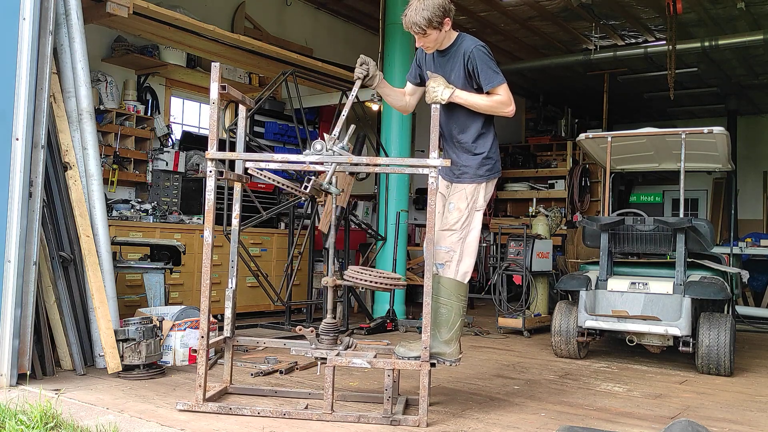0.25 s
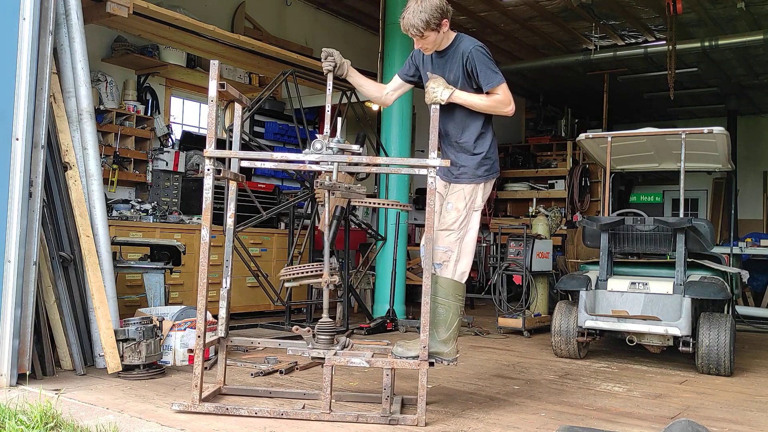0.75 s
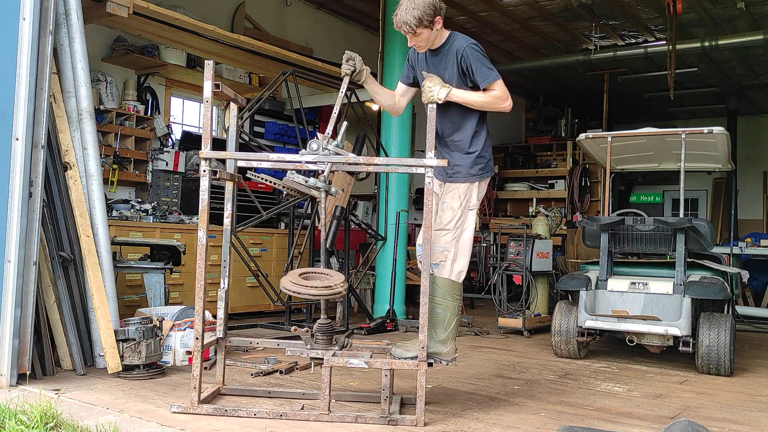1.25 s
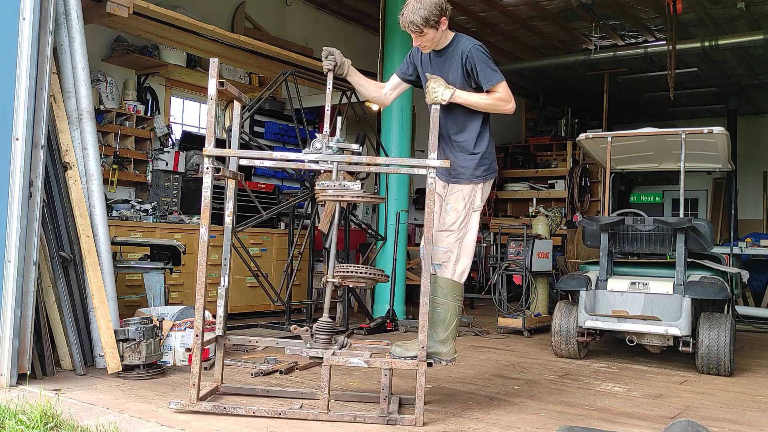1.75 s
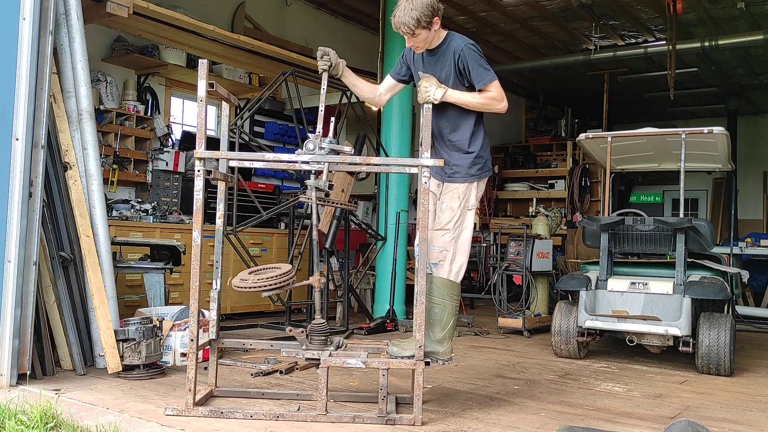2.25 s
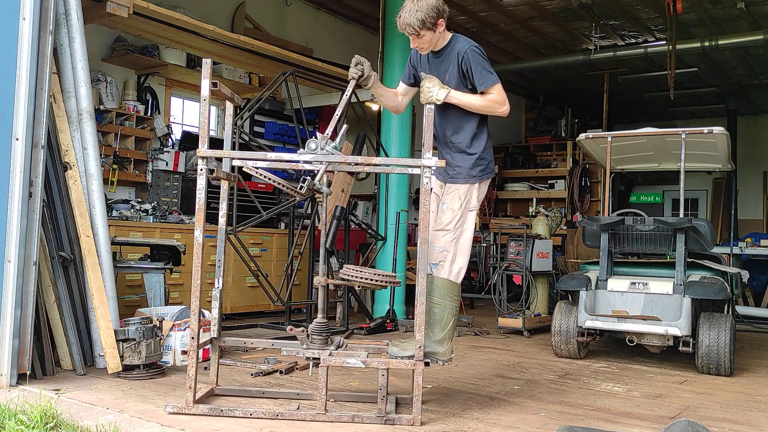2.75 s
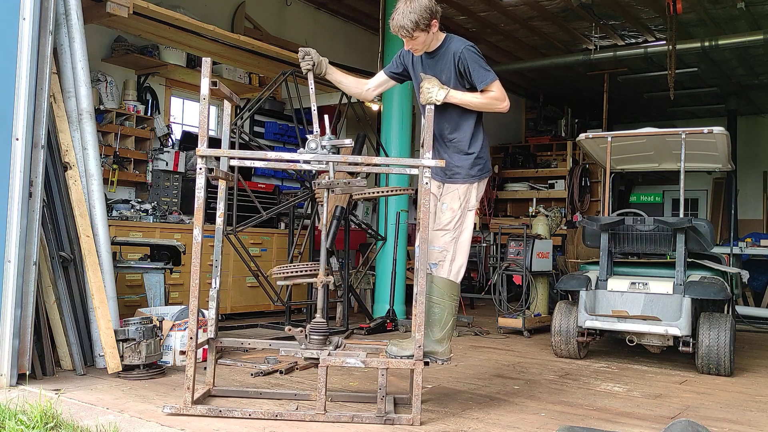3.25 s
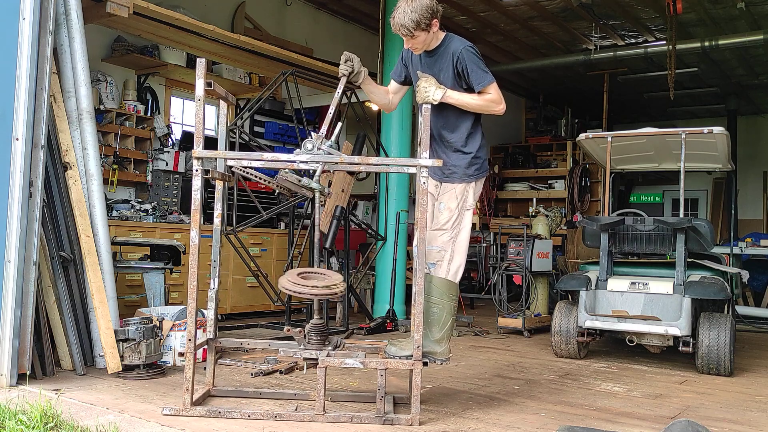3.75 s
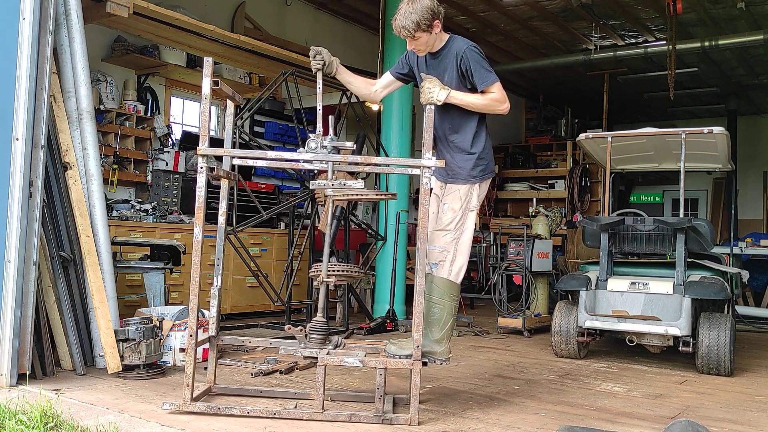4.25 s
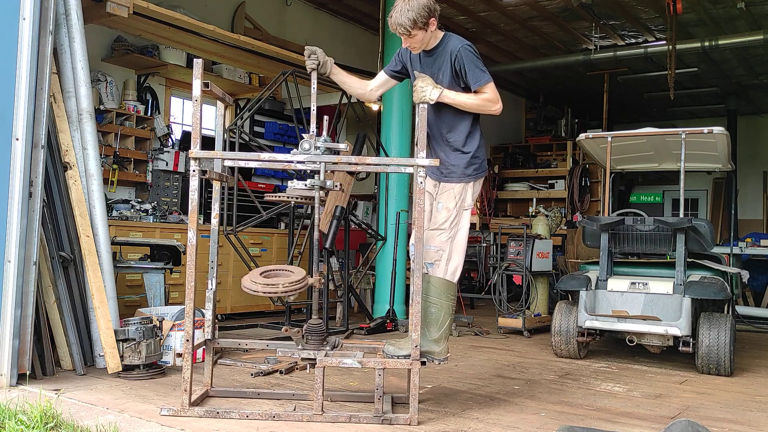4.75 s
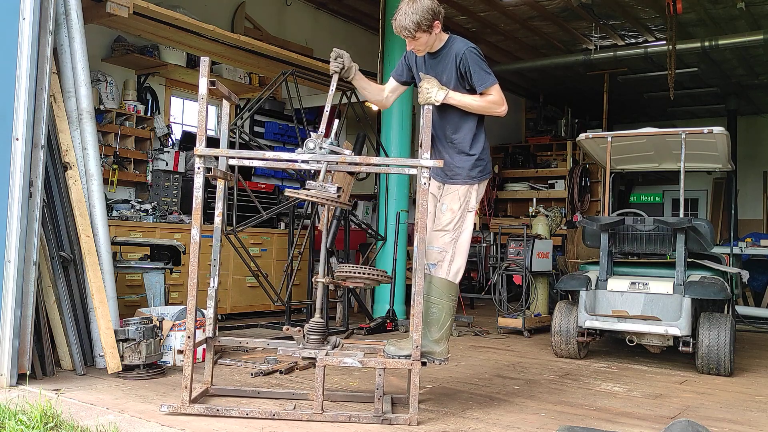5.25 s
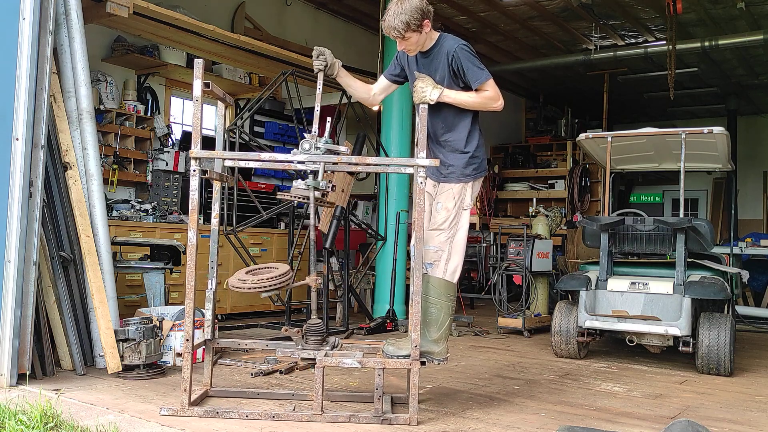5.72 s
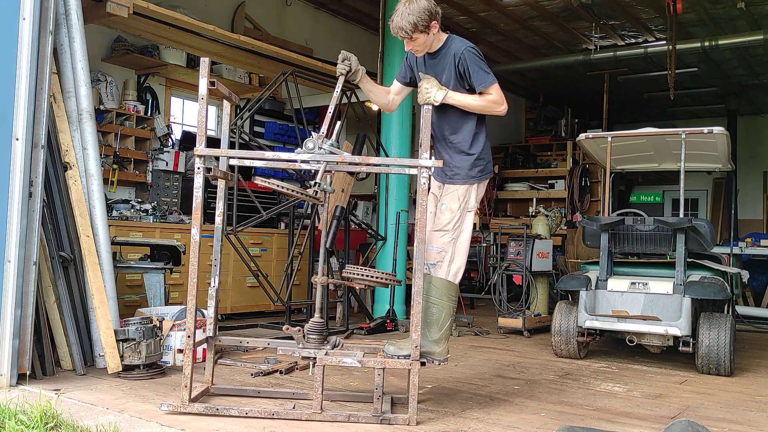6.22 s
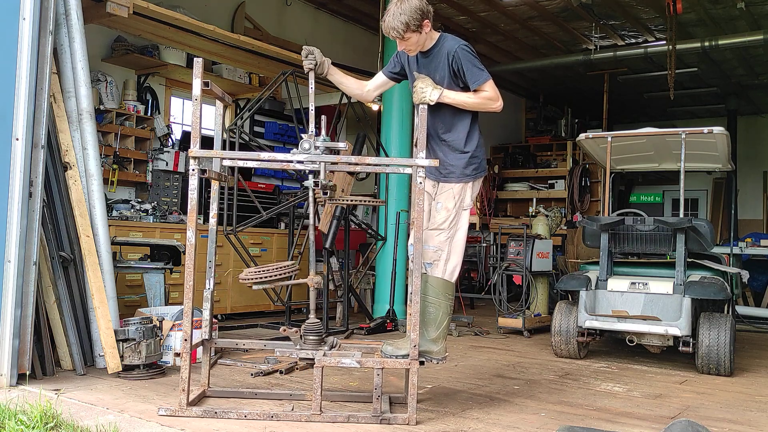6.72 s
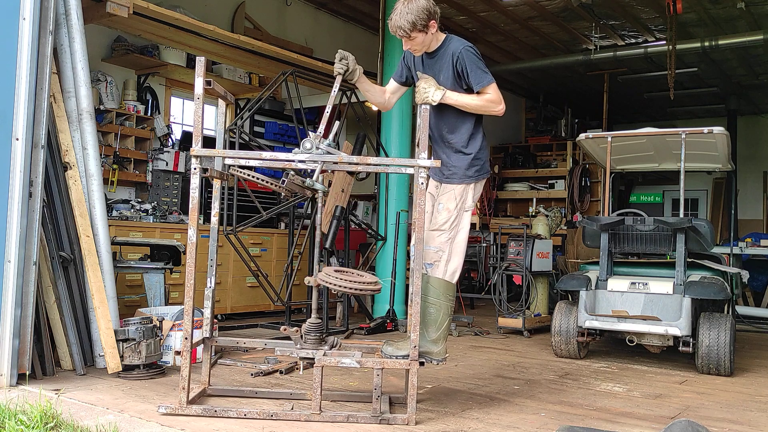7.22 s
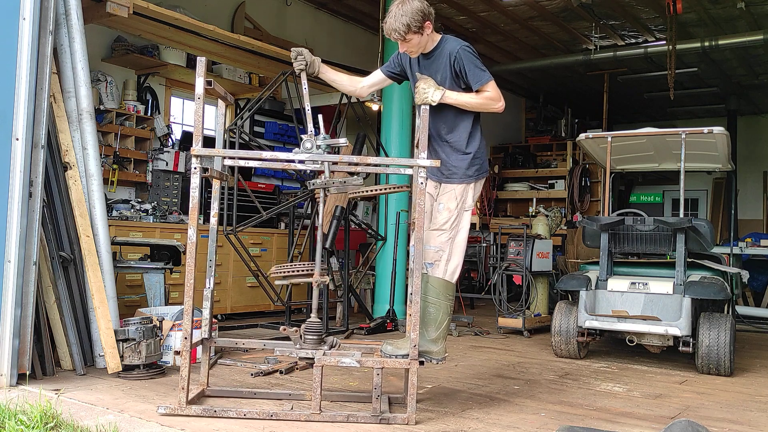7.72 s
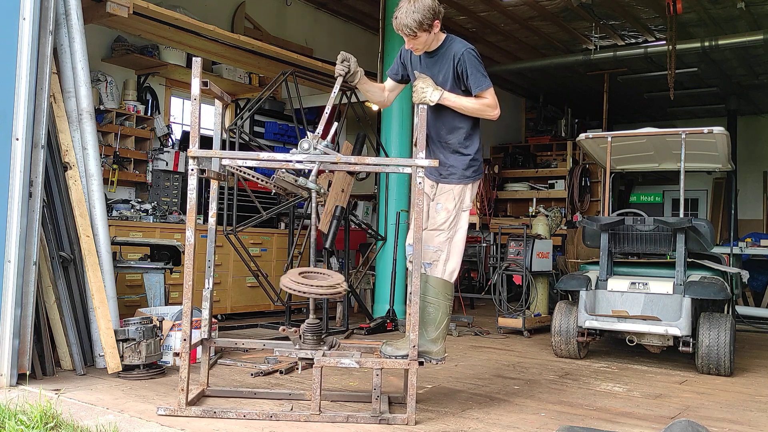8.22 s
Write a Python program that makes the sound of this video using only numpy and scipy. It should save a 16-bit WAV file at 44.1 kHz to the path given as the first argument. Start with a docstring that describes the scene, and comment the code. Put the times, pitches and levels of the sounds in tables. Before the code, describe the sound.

Irregular wooden thuds, hard metal clanks and short rusty scrapes from a hand-rocked steel contraption, with a low engine hum steadily behind.

```python
"""A homemade steel machine is rocked by a hand lever on the wooden floor of an open workshop.
Its feet thud on the boards and loose joints clank, as coloured noise bursts; struck steel parts ring
in decaying modes. Dry pivots chirp and squeal as wavering tones, bearings scrape and plates clatter
as shaped noise. An engine idles some way off, a sum of orders of its firing rate, over soft air noise.
"""
import sys
import numpy as np
from scipy import signal
from scipy.fft import rfft, irfft, next_fast_len
from scipy.io import wavfile

SR = 44100
rng = np.random.default_rng(int(sys.argv[2]) if len(sys.argv) > 2 else 0)


def unload_wav(signal):
    """Save mono or channel-first audio to the path in sys.argv[1] as 16-bit WAV at rate SR, clipped to [-1, 1]."""
    wavfile.write(
        sys.argv[1],
        SR,
        np.round(np.clip(np.atleast_2d(signal).T, -1, 1) * 32767).astype(np.int16),
    )


N = 373968


def amp(db):
    """Decibels to gain."""
    return 10 ** (np.asarray(db) / 20)


def evened(x):
    """Scales to rms 1."""
    return x / np.sqrt(np.mean(x ** 2) + 1e-20)


def read(points, hz):
    """Reads a spectrum on a log-frequency axis."""
    f, value = np.transpose(points)
    return np.interp(np.log(hz + 1), np.log(f + 1), value)


def follow(rows):
    """Reads each column of a curve at every sample."""
    s, *columns = np.transpose(rows)
    return [np.interp(np.arange(N) / SR, s, c) for c in columns]


def add(mix, s, sound):
    """Mixes a sound in at s seconds."""
    part = mix[:, max(round(s * SR), 0):][:, :sound.shape[-1]]
    part += sound[..., :part.shape[-1]]


def bins(size):
    """The frequencies of a real FFT."""
    return np.fft.rfftfreq(size, 1 / SR)


def wander(per_s, size):
    """A random curve of rms 1, straight between per_s random points a second."""
    knots = rng.standard_normal(int(size / SR * per_s) + 2)
    return evened(np.interp(np.arange(size) / SR * per_s, np.arange(len(knots)), knots))


def causal(db):
    """The minimum-phase response with these gains: it starts at once and rings afterwards."""
    log_gain = np.log(amp(np.r_[db, db[-2:0:-1]]))
    return np.exp(np.conj(signal.hilbert(log_gain)))[:len(db)]


def noise(size, colour=((1, 0), (2, 0))):
    """Coloured noise of rms 1, partly alike in the two channels."""
    # Each row: frequency in Hz, likeness of the channels from 0 to 1.
    likeness = [(60, 1), (130, 0.93), (290, 0.95), (640, 0.35), (1410, 0.18), (3100, 0.033), (6810, 0.02),
                (15000, 0.062)]
    hz = bins(size)
    a, b = rfft(rng.standard_normal((2, size)))
    same = np.clip(read(likeness, hz), 0, 1)
    pair = np.array([a, same * a + np.sqrt(1 - same ** 2) * b])
    return evened(irfft(pair * amp(read(colour, hz)), size))


def blow(colour, bands, levels_db, t60, rise, crack, chatter_db, span=0.011, size=16384):
    """A first crack and a chattering contact colour one blow; each band's energy is set over span seconds."""
    t, hz = np.arange(size) / SR, bins(size)
    contact = amp(chatter_db * wander(498, size) - 60 * t / t60) * (1 - np.exp(-t / rise))
    drive = noise(size) * contact
    drive[:, 0] += crack * np.linalg.norm(drive[0])
    z = rfft(drive) * causal(read(colour, hz))
    for _ in range(2):  # neighbouring bands overlap, so the balance settles in two steps
        power = 2 * np.mean(abs(z) ** 2, axis=0) / (size * span * SR)
        lift = []
        for (lo, hi), db in zip(bands, levels_db):
            band_db = 10 * np.log10(power[(hz > lo) & (hz < hi)].sum())
            lift.append((np.sqrt(lo * hi), db - band_db))
        z = z * causal(read(lift, hz))
    return irfft(z)


def ring(blows, modes, crowd, crowd_t60, rise, count, split_hz=4, twin_db=-13, damping_spread=0.18,
         jolt=0.072, jolt_s=0.004):
    """A steel part rings with a few clear modes over a crowd of weaker ones, each dying at its own speed."""
    t, out = np.arange(SR) / SR, np.zeros((2, N))
    hz, db, t60 = np.transpose(modes)[:, :, None]
    tones = amp(db - 60 * t / t60) * np.exp(2j * np.pi * hz * t)
    # an uneven bar bends two ways at nearly the same pitch, so each mode beats with a weaker twin
    beat_hz = split_hz * rng.standard_normal((len(modes), 1))
    start = rng.random((len(modes), 1))
    tones = tones * (1 + amp(twin_db) * np.exp(2j * np.pi * (beat_hz * t + start)))
    # the weaker modes lie scattered over the part's whole range
    hz = np.interp(np.arange(count) + rng.random(count), [0, count], [crowd[0][0], crowd[-1][0]])
    t60 = crowd_t60 * np.exp(damping_spread * rng.standard_normal(count))
    step = amp(-60 / t60 / SR) * np.exp(2j * np.pi * hz / SR)  # one sample's turn and decay
    weak = np.cumprod(np.broadcast_to(step[:, None], (count, SR)), axis=1)
    gain = amp(read(crowd, hz))
    gain = gain / np.linalg.norm(gain)
    # loudest while the faces still press together
    contact = (1 - np.exp(-t / rise)) * (1 + jolt * np.exp(-t / jolt_s))
    for s, clear_db, crowd_db in blows:
        # the clear modes' phases are closer between the channels than the crowd's
        phase = rng.uniform(0, 2 * np.pi, len(modes)) + rng.standard_normal((2, len(modes))) / 2
        clear = amp(clear_db) * (np.exp(1j * phase) @ tones).imag
        phase = rng.uniform(0, 2 * np.pi, count) + rng.standard_normal((2, count))
        close = amp(crowd_db) * np.sqrt(2) * ((gain * np.exp(1j * phase)) @ weak).imag
        add(out, s, (clear + close) * contact)
    return out


def engine(throb_db=1, upper_db=-1.5, split_hz=290, uneven_db=0.66, jitter_turns=0.00215,
           start_turn=0.2052, echoes=0.21, count=9):
    """Orders of the firing rate take the silencer's response; slowly shifting echoes colour each one."""
    # The engine's speed. Each row: time in seconds, firings per second.
    idle = [(0, 28.08), (1.2, 28.08), (1.8, 28.22), (4.2, 28.2), (5.2, 27.97), (7.0, 27.93), (8.48, 27.45)]
    # The drifting loudness, before the trims. Each row: time in seconds, throb in dB, upper orders in dB.
    throb = [(0, -48, -74), (0.4, -52.5, -65), (0.62, -50, -57.5), (.78, -52, -61), (1.0, -48.5, -61),
             (1.25, -51, -64), (1.55, -49, -60.5), (1.75, -52, -63), (2.0, -54, -76), (2.42, -47, -68),
             (2.72, -55, -68), (3.0, -52, -68), (3.3, -55.5, -66), (3.47, -50, -70), (3.65, -58, -63),
             (4.25, -59, -63), (4.38, -50, -70), (4.5, -53.5, -66), (5.25, -54.5, -79), (5.5, -50.5, -77),
             (5.95, -59, -72), (6.15, -50.5, -61), (6.33, -61, -80), (6.7, -61, -72), (6.9, -52.5, -68),
             (7.1, -60, -65), (7.55, -51, -69), (7.77, -60, -67), (8.03, -51.5, -72), (8.25, -54.5, -85)]
    # The exhaust note. Each row: multiple of the firing rate, relative level in dB.
    exhaust = [(1, -6), (2, -2.5), (3, -1), (4, -2), (5, -7), (6, 1), (7, 9.5), (8, 4.5), (9, -5.5),
               (10, -7), (11, -14), (12, -11), (13, -16), (14, -14), (15, -11), (16, -17), (17, -16.5),
               (18, -28), (19, -26), (20, -27)]
    smear_s_per_hz = 7e-5  # over the distance the orders take the phase of a delay growing with frequency
    turns = start_turn + np.cumsum(follow(idle)[0]) / SR + jitter_turns * wander(23, N)
    order, db = np.transpose(exhaust)
    firing_hz, hz = np.mean(np.array(idle)[:, 1]), bins(size=8192)
    pipe = causal(read(np.c_[order * firing_hz, db], hz))
    pipe = pipe * np.exp(-1j * np.pi * smear_s_per_hz * hz ** 2)
    low, high = np.zeros(N), np.zeros(N)
    turn, line = np.exp(2j * np.pi * turns), np.ones(N, complex)
    place = np.linspace(0, count - 1, N)
    for k in order:
        line = line * turn  # the next order up
        shift = 1 + echoes * (rng.standard_normal((count, 2)) @ [1, 1j])
        path = pipe[np.searchsorted(hz, k * firing_hz)] * shift
        part = low if k * firing_hz < split_hz else high
        part += (np.interp(place, np.arange(count), path) * line).real
    low_db, high_db = follow(throb)
    both = amp(low_db + throb_db) * evened(low) + amp(high_db + upper_db) * evened(high)
    return both * amp(uneven_db * wander(28, N))


def air(level_db=-56, swell_db=1):
    """Low rumble and faint hiss from the open door: coloured noise that swells a little."""
    # Each row: frequency in Hz, relative level in dB per Hz.
    colour = [(15, -5), (25, -5), (55, -8), (110, -8), (200, -8), (290, -15.5), (370, -18.5), (500, -19.5),
              (880, -28.5), (2000, -38), (5000, -43.5), (7700, -39.5), (9100, -44.5), (10500, -51.5),
              (15000, -62)]
    return amp(level_db + swell_db * wander(7.3, N)) * noise(N, colour)


def scrape(grain_db=1.5, clump_db=2, attack_s=0.034, release_s=0.033):
    """Rusty faces rub in clumps of fine grains as the arm turns; each scrape swells, holds and dies away."""
    # Each row: start in seconds, length before the release in seconds, level in dB.
    scrapes = [(0.016, .03, -70), (0.472, 0.25, -62), (0.674, 0.032, -61), (0.859, 0.086, -62.5),
               (0.968, 0.093, -66), (1.276, 0.12, -57.5), (1.428, 0.058, -57.5), (1.649, 0.15, -67.5),
               (2.082, 0.057, -64.5), (2.19, 0.13, -56), (2.534, 0.24, -70.5), (2.965, 0.11, -59),
               (3.39, 0.15, -70.5), (4.243, 0.016, -59), (4.304, 0.12, -61.5), (5.165, 0.024, -66.5),
               (5.464, 0.043, -74), (6.046, 0.054, -68), (6.127, 0.064, -63.5), (6.293, 0.024, -69),
               (6.557, 0.09, -56), (6.912, 0.17, -72.5), (7.772, 0.23, -77), (8.037, 0.038, -65),
               (8.363, 0.07, -57.5)]
    # Colour of the rubbing. Each row: frequency in Hz, relative level in dB per Hz.
    rub = [(300, -1), (700, 2.5), (1500, -3.5), (2600, -4.5), (4500, -9.5), (6000, -8.5), (7500, 1),
           (9000, -5), (11000, -56), (15000, -77)]
    turning_db, turning_swell_db = -80, -0.5  # between the scrapes the bearings rub faintly and unevenly
    t = np.arange(SR // 2) / SR
    power = amp(turning_db + turning_swell_db * wander(7.5, N))[None] ** 2
    for s, length, db in scrapes:
        shape = np.minimum(t / attack_s, 1) * np.exp(-np.maximum(t - length, 0) / release_s)
        add(power, s, (amp(db) * shape) ** 2)
    grains = amp(grain_db * wander(1500, N) + clump_db * wander(70, N))
    return np.sqrt(power) * evened(noise(N, rub) * grains)


def chirps(rise=0.0018, rough=0.077, glide_s=0.014, third_db=-20, flutter_db=4, size=16384):
    """A dry pivot sticks and slips for a moment: a rough tone with overtones glides up and dies away."""
    # Each row: start in seconds, pitch in Hz, level in dB before doubling and colouring, octave in dB
    # relative to the tone, t60 in seconds, glide as a share of the pitch.
    slips = [(0.522, 2950, -54, -25, 0.11, 0.022), (1.316, 3460, -40.5, 1, 0.07, 0.033)]
    # The pivot's resonances. Each row: frequency in Hz, gain in dB.
    pivot_colour = [(2400, -6), (2880, 2), (3100, -4), (3330, 2), (3620, -1), (3800, -5), (4000, 1),
                    (4350, -9), (5100, -24), (6000, -6), (6780, 1), (7120, 2), (7340, -5), (7550, 1),
                    (8020, 1), (8500, -10), (10300, 1), (11000, -20)]
    t, out = np.arange(SR // 4) / SR, np.zeros((2, N))
    for s, hz, db, octave_db, t60, glide in slips:
        pitch = hz * (1 + glide * (.5 - np.exp(-t / glide_s)) + rough * wander(1143, len(t)))
        turn = 2 * np.pi * np.cumsum(pitch) / SR
        tone = np.sin(turn) + amp(octave_db) * np.sin(2 * turn)
        tone = tone + amp(octave_db + third_db) * np.sin(3 * turn)
        grip = evened(amp(flutter_db * np.tanh(wander(360, len(t)))))  # the contact pressure flutters
        slip = 2 * tone * grip * amp(db - 60 * t / t60) * (1 - np.exp(-t / rise))
        add(out, s, irfft(rfft(slip, size) * causal(read(pivot_colour, bins(size)))))
    return out


def squeals(arch=.012, waver=.005, flutter_db=4):
    """Thin tones from the turning pivot swell and fade; their pitch arches a little with the swing."""
    # Each row: start in seconds, length in seconds, pitch at the top of the arch in Hz, level in dB.
    songs = [(.85, .47, 3330, -83.5), (.98, .1, 2100, -79), (1.447, .63, 3236, -85.5),
             (1.565, .045, 6350, -74), (1.675, .05, 6340, -76), (1.8, .13, 6850, -79),
             (1.825, .055, 6360, -76), (1.945, .04, 6350, -73), (2.4, .44, 7170, -75.5),
             (3.6, .32, 7180, -76.5), (8.13, .38, 7130, -73)]
    out = np.zeros((2, N))
    for s, length, hz, db in songs:
        size = int(length * SR)
        swing = np.sin(np.pi * np.arange(size) / size)
        pitch = hz * (1 + arch * (swing - 1) + waver * wander(300, SR)[:size])
        # the level flutters with the grip
        gain = amp(db + flutter_db * np.tanh(wander(60, SR)[:size])) * np.sqrt(swing)
        add(out, s, gain * np.sin(2 * np.pi * np.cumsum(pitch) / SR))
    return out


def thuds(trim_db=-1, chatter_db=2):
    """The frame rocks and its feet drop on the floor boards, one after the other, as noise bursts."""
    # Each row: first landing in seconds, gap to the second foot in seconds, first and second foot in dB
    # before the trim, then relative to the foot in dB: boom of the boards, first rap, second rap.
    rocks = [(1.11, 0.11, -42.5, -65, -22, -15, -9), (2.185, 0.041, -37.5, -35, -9, -6, -15),
             (2.831, 0.019, -42.5, -36.5, -4, -17, -18), (2.989, 0.022, -39, -35, -10, -11.5, -13.5),
             (3.861, 0.032, -41, -38.5, -7.5, -15, -11), (3.956, 0.071, -43, -41.5, -1.5, -12, -7),
             (4.654, 0.035, -38.5, -35, 3, 2, -0.5), (4.819, 0.027, -34.5, -39.5, -1, -7.5, -9),
             (5.651, 0.028, -38, -38.5, -9.5, -12.5, -10), (5.745, 0.069, -44.5, -44.5, 0.5, 4.5, -1.5),
             (6.551, 0.038, -40, -38.5, -1.5, -11.5, -6.5), (7.246, 0.022, -42.5, -42.5, 1.5, -2.5, -2.5),
             (7.405, 0.031, -36, -41, -4.5, -14, -6.5), (8.333, 0.029, -36, -37.5, -8, -11.5, -10.5)]
    # Colour of the boards. Each row: frequency in Hz, relative level in dB per Hz.
    boards = [(28, -25), (55, 1), (83, 3.5), (120, 1), (160, 1), (205, 6.5), (265, -4.5), (330, -7),
              (450, -11), (800, -17.5), (1400, -28.5), (3000, -42.5), (6000, -81)]
    bands = [(50, 140), (140, 450), (450, 1400)]  # boom, body and rap, in Hz
    t60 = 0.11
    out = np.zeros((2, N))
    for s, gap, first_db, second_db, boom_db, first_rap_db, second_rap_db in rocks:
        # start s, level dB, rap dB, rise s, crack: the first foot settles, the second drops
        feet = [(s, first_db, first_rap_db, 0.0055, 0.12),
                (s + gap, second_db, second_rap_db, 0.0013, 0.22)]
        for at, db, rap_db, rise, crack in feet:
            levels_db = [db + boom_db, db, db + rap_db]
            add(out, at, blow(boards, bands, levels_db, t60, rise, crack, chatter_db))
    return amp(trim_db) * out


def clanks(trim_db=-3.0, clang_db=-2.5, rise=0.0013, chatter_db=-2.0, crack=0.32):
    """Play in the joints is taken up with a hard blow; brightness tips it from body to sizzle."""
    # Each row: start in seconds, level in dB before the trim, brightness in dB, contact t60 in seconds.
    hits = [(2.061, -60, 4, 0.13), (1.112, -71, -14, .025), (1.2, -68, -11.5, 0.02),
            (2.182, -47.5, -4.5, 0.081), (2.189, -43.5, 5.5, 0.14), (2.485, -63, 8.5, 0.15),
            (2.808, -49.5, 4, 0.045), (2.828, -45.5, -6.5, 0.068), (2.873, -46.5, -2.5, 0.22),
            (3.057, -57.5, -2, 0.12), (3.15, -63, -9, 0.084), (3.863, -52.5, -3, 0.074),
            (3.891, -58.5, -6, 0.03), (3.9544, -37.5, -2, 0.15), (4.0305, -59.5, -16, 0.02),
            (4.466, -63, 6.5, 0.089), (4.643, -36, 2, 0.055), (4.663, -28.5, -4, 0.04),
            (4.824, -44, -0.5, 0.3), (4.936, -49, -4, 0.033), (5.254, -58, -2, 0.14),
            (5.264, -59.5, 6.5, 0.074), (5.659, -65, -15, 0.023), (5.68, -59, -14, 0.034),
            (5.694, -45, 0.5, 0.024), (5.703, -38.5, 0.5, 0.025), (5.7394, -37.5, 1, 0.052),
            (5.75, -37, 2, 0.071), (5.815, -62, -11, 0.036), (6.453, -59.5, 3.5, 0.036),
            (6.592, -50.5, -6.5, 0.019), (7.224, -47, -1.5, 0.27), (7.453, -52, -8, 0.043),
            (7.504, -49, -3.5, 0.029), (8.337, -64.5, -12, 0.026), (8.345, -72, -9, 0.027),
            (8.363, -64, -15.5, 0.032), (8.405, -58.5, 4, 0.077)]
    # Colour of the steel joints. Each row: frequency in Hz, relative level in dB per Hz.
    steel_colour = [(150, -27.5), (250, -5), (457, -10.5), (572, -9.5), (1730, -4), (1950, -2), (2250, 1),
                    (2600, 0.5), (3550, -7.5), (3830, -10.5), (4050, -7), (4460, -11), (5480, -13),
                    (7350, -7), (9520, -16), (11300, -49), (13700, -34), (15400, -55)]
    bands = [(600, 1800), (1800, 4000), (5000, 10000)]  # body, clang and sizzle, in Hz
    out = np.zeros((2, N))
    for s, db, bright_db, t60 in hits:
        levels_db = [db - bright_db, db + clang_db, db + bright_db]
        add(out, s, blow(steel_colour, bands, levels_db, t60, rise, crack, chatter_db))
    return amp(trim_db) * out


def bracket_rings():
    """The swinging arm's bracket jangles in its own modes when it is jolted."""
    # Each row: start in seconds, gain of the clear modes in dB, gain of the crowded modes in dB.
    blows = [(2.19, -57, -63), (3.15, -76, -77), (3.954, -49, -46), (5.695, -49.5, -53), (5.703, -49, -47),
             (5.74, -47, -43), (7.453, -77, -75), (7.504, -65, -64)]
    # The clear modes. Each row: frequency in Hz, relative level in dB, t60 in seconds.
    modes = [(800, -10, .2), (1225, 0, .22), (1700, -5, .22), (1760, -6, .21), (2110, 3, .1),
             (2215, 5, .14), (2400, -3, .12), (3610, -8, .2), (4010, -7, .15), (5100, -7, .15),
             (5745, -4, .2), (5800, -4, .2), (6620, -5, .35), (7320, -4, .25), (7500, -2, .3),
             (7714, 1, .22), (8075, -1, .2)]
    # Range and balance of the crowded modes. Each row: frequency in Hz, relative level in dB per Hz.
    crowd = [(500, -6), (1300, -3), (1850, -7), (2180, 3), (2700, -30), (4000, -1), (4450, -22),
             (5100, -10), (6200, -11), (6800, -12), (7700, -1), (9300, -7), (11000, -51)]
    return ring(blows, modes, crowd, crowd_t60=0.22, rise=0.00054, count=200, jolt=0.36, jolt_s=0.002)


def rattles(ticks_per_s=130, spread_db=4.5, tick_t60=.014, size=2048):
    """Loose weight plates clatter on their pin after a landing: small, uneven rebounds swell and die out."""
    # Each row: start in seconds, length in seconds, level in dB.
    runs = [(2.213, 0.096, -58), (2.989, .11, -65), (4.833, 0.075, -63), (6.581, 0.082, -60.5),
            (7.411, .04, -62), (8.386, 0.062, -58)]
    # Colour of the plates. Each row: frequency in Hz, relative level in dB per Hz.
    plates = [(300, -4), (800, 5.5), (1300, 4), (2100, 1.5), (2700, -2), (3800, -11.5), (6000, -9.5),
              (7600, 0.5), (9000, -6), (11000, -52), (15000, -55)]
    t, out = np.arange(size) / SR, np.zeros((2, N))
    density = np.sqrt(SR / size / ticks_per_s)  # sets the level of the run, not of one tick
    for s, length, db in runs:
        count = max(round(length * ticks_per_s), 2)
        place = (np.arange(count) + rng.random(count)) / count
        force = np.sqrt(np.sin(np.pi * place)) * amp(spread_db * rng.standard_normal(count))
        for at, strength in zip(s + place * length, evened(force)):
            tick = evened(noise(size, plates) * amp(-60 * t / tick_t60))
            add(out, at, amp(db) * strength * tick * density)
    return out


def lever_rings():
    """The lever hits its stop and rings in its own modes, with a strong first jolt."""
    # Each row: start in seconds, gain of the clear modes in dB, gain of the crowded modes in dB.
    blows = [(2.8075, -46.5, -37), (3.954, -71, -49), (5.695, -60, -47), (5.703, -66, -62),
             (5.739, -65, -50), (7.2225, -46.5, -39.5)]
    # The clear modes. Each row: frequency in Hz, relative level in dB, t60 in seconds.
    modes = [(545, -6.0, 0.45), (598, -18, 2.5), (640, -18, 2.5), (756, -13, 0.3), (813, -16, 0.45),
             (926, -14, 0.45), (1030, -11, 0.45), (1094, -7, 0.3), (1180, -8, 0.39), (1518, -6.5, 0.22),
             (1568, -8, 0.27), (1696, -13, .38), (1809, -5, 0.3), (2058, -1, 0.33), (2420, 3, .1),
             (2464, 0, 0.26), (2498, -2, 0.25), (2555, 1, 0.38), (2600, -11, 0.45), (2660, -12, .5),
             (2700, -7, 0.5), (2735, -11, .5), (2770, -11, .45), (2803, -8, 0.38), (2840, -9, .45),
             (2873, -7, 0.3), (2910, -12, .4), (3025, -8, .36), (3060, -4, 0.2), (3117, 1, 0.17),
             (3250, -12, .35), (3300, -11, .33), (3400, -11, .3), (3605, -13, .33)]
    # Range and balance of the crowded modes. Each row: frequency in Hz, relative level in dB per Hz.
    crowd = [(450, -22), (1100, -10), (1700, -4), (1950, -4), (2220, -2.5), (2440, 0.5), (2800, 1),
             (2980, -4), (3130, -0.5), (3500, -6), (3830, -10), (4100, -15.5), (4500, -7), (5300, -24)]
    return ring(blows, modes, crowd, crowd_t60=0.14, rise=0.0019, count=230, jolt=0.93, jolt_s=0.0069)


def frame_rings():
    """The hardest blows set the whole frame ringing in its own modes."""
    # Each row: start in seconds, gain of the clear modes in dB, gain of the crowded modes in dB.
    blows = [(3.955, -55.5, -46), (4.6435, -31.5, -31.5), (4.663, -50, -37.5), (5.739, -52, -49)]
    # The clear modes. Each row: frequency in Hz, relative level in dB, t60 in seconds.
    modes = [(422, -8, .3), (447, 0, 0.38), (486, -10, 0.28), (598, -22, 2.2), (640, -26, 1.8),
             (650, -8, 0.25), (694, -9.5, 0.45), (759, -11, 0.3), (821, -4.5, 0.37), (888, -11, 0.3),
             (934, -12, 0.38), (1030, -8, 0.5), (1082, -2.5, 0.25), (1180, -5, 0.47), (1250, -4.5, 0.25),
             (1296, -8, 0.26), (1360, -12, .35), (1440, -2.5, 0.28), (1542, -4, 0.33), (1705, 0, 0.36),
             (1782, -1, 0.32), (2004, -11, 0.25), (2056, -11.4, 0.42), (2190, -11, .22), (2462, -3, 0.26),
             (2591, -4.5, 0.27), (2685, -10, 0.25), (2789, -8.5, 0.45), (3042, -14, .4), (3219, -15, .4),
             (4329, -13.5, 0.38), (4405, -15, .35), (4542, -16, 0.35), (4587, -14, 0.38), (4780, -17, .33),
             (4835, -16, .33), (5010, -18, .33), (5238, -20, .4), (6551, -15, .6), (6739, -8, 0.25),
             (6918, -2, 0.25), (7436, -7.5, 0.52), (7607, -9, .25), (8473, -14, .3)]
    # Range and balance of the crowded modes. Each row: frequency in Hz, relative level in dB per Hz.
    crowd = [(150, -12), (450, -28), (1700, 4), (2250, -22), (2650, 7), (3000, -15), (3550, -36),
             (3830, -46), (4000, -26), (4300, -8.5), (5000, 0), (5400, -21), (5750, -3), (6300, 0),
             (7000, 8), (7650, 0), (8050, -14), (8600, -9), (9300, -18), (11000, -64)]
    return ring(blows, modes, crowd, crowd_t60=0.31, rise=.0009, count=240)


def workshop(x, build=0.00028):
    """The cluttered room's tail builds up quickly, and each band dies at its own speed."""
    # Each row: frequency in Hz, t60 in seconds.
    room = [(100, 0.91), (400, 0.38), (1200, 0.26), (3000, 0.45), (7500, 0.52), (14000, 0.18)]
    hz, t, z = signal.stft(noise(SR), SR, nperseg=256)
    tail = signal.istft(z * amp(-60 * t / read(room, hz)[:, None]), SR, nperseg=256)[1]
    tail = tail * (1 - np.exp(-np.arange(tail.shape[1]) / SR / build))
    return signal.fftconvolve(x[None], tail / np.linalg.norm(tail[0]), axes=1)[:, :N]


def scene(thud_room_db=-4, clank_room_db=-4, ring_room_db=-13, pivot_room_db=-3):
    """The machine in its room, over the engine and the air."""
    pivot = chirps() + squeals()
    wood = thuds()
    steel = clanks() + rattles()
    rings = bracket_rings() + lever_rings() + frame_rings()
    send = amp(thud_room_db) * wood + amp(clank_room_db) * steel
    send = send + amp(ring_room_db) * rings + amp(pivot_room_db) * pivot
    return wood + steel + rings + pivot + workshop(send[0]) + scrape() + engine() + air()


def record(dry):
    """The two channels differ in level and phase; then the treble is cut off at 15300 Hz."""
    # Each row: frequency in Hz, left minus right in dB.
    lean_db = [(60, 13), (110, 7.5), (200, 8), (380, 6.5), (700, 5), (1290, 4), (2380, 2), (4400, -2.5),
               (8120, -3), (15000, 4.5)]
    # Each row: frequency in Hz, lead of the left channel in radians.
    lead = [(60, -.1), (800, -.25), (2400, .3), (3200, -.8), (4200, .2), (6000, 0), (6900, -1.4),
            (7700, -.4), (15000, 0)]
    size = next_fast_len(N + 4096)
    hz = bins(size)
    halves = np.array([[.5], [-.5]])  # each difference is shared between left and right
    lean = amp(halves * read(lean_db, hz))
    ports = lean / lean.mean(axis=0) * np.exp(1j * halves * read(lead, hz))
    heard = irfft(rfft(dry, size) * ports, size)[:, :N]
    low_pass = signal.firwin(511, 15300, window=("kaiser", 9), fs=SR)
    return signal.oaconvolve(heard, low_pass[None], "same")


dry = scene()
out = record(dry)
unload_wav(out)
```